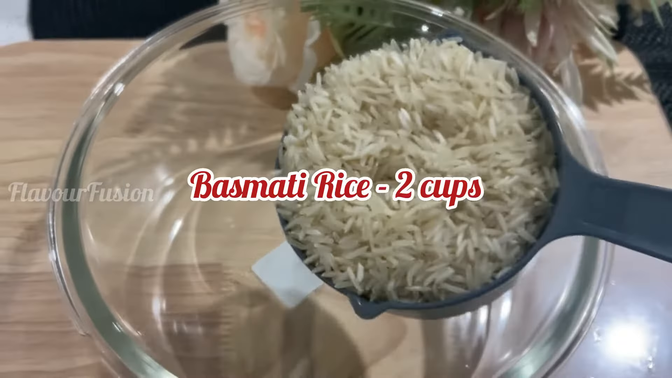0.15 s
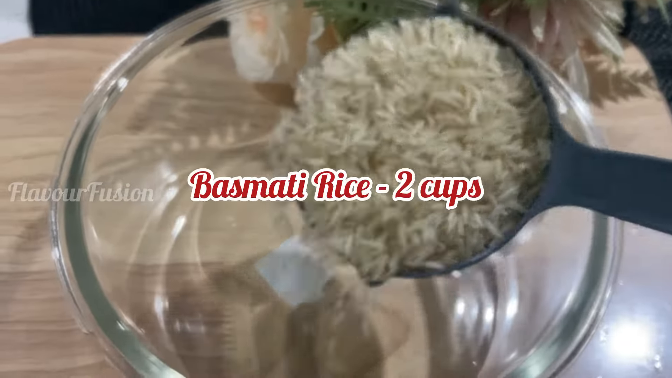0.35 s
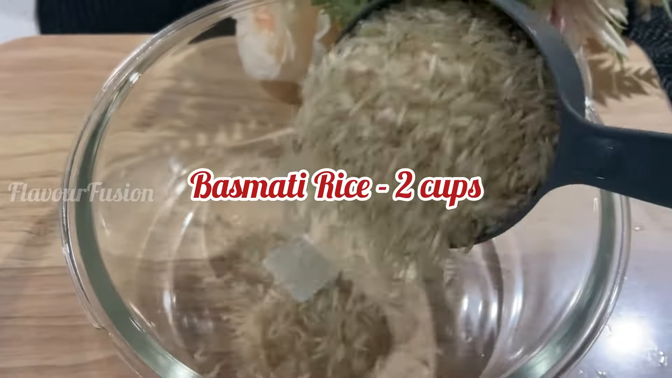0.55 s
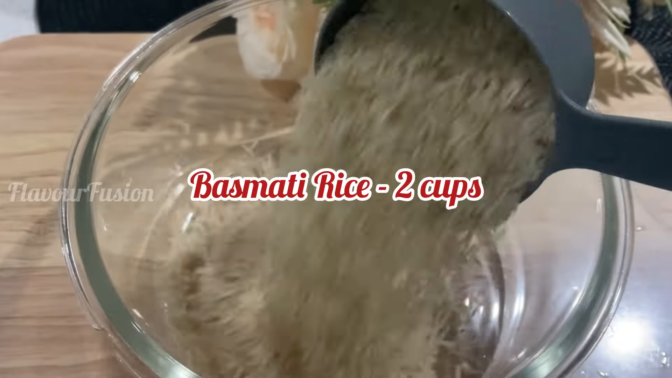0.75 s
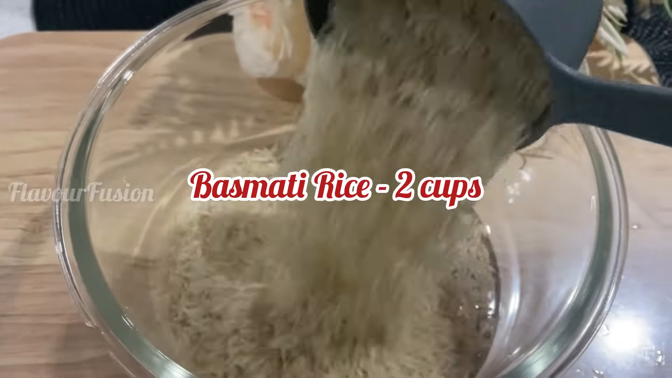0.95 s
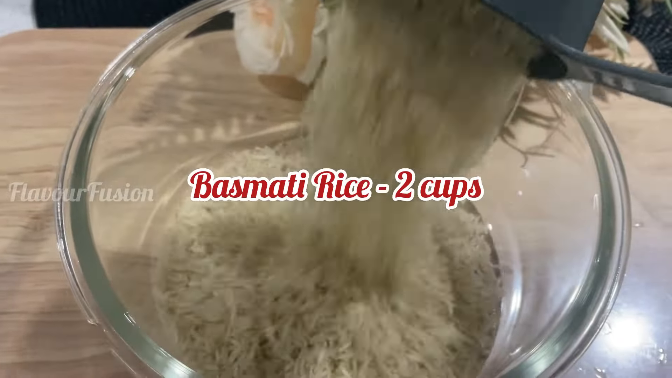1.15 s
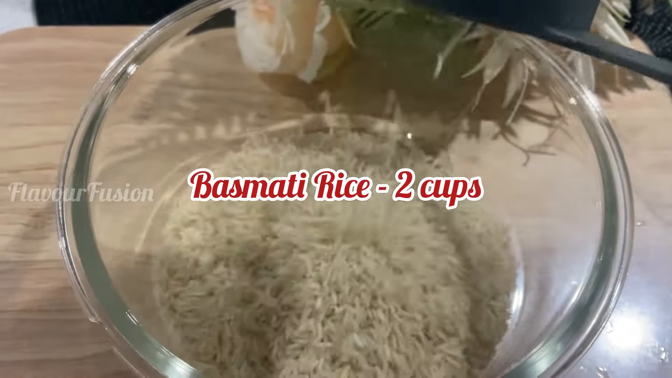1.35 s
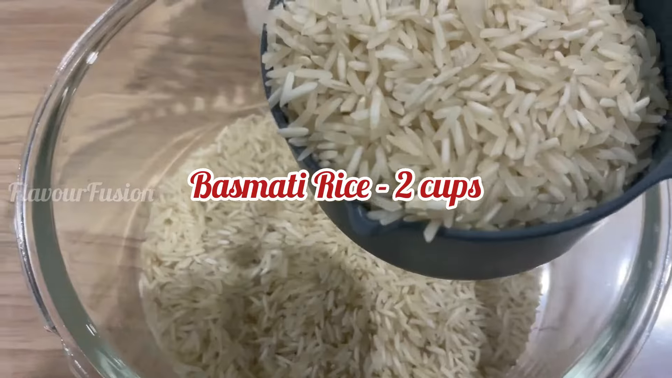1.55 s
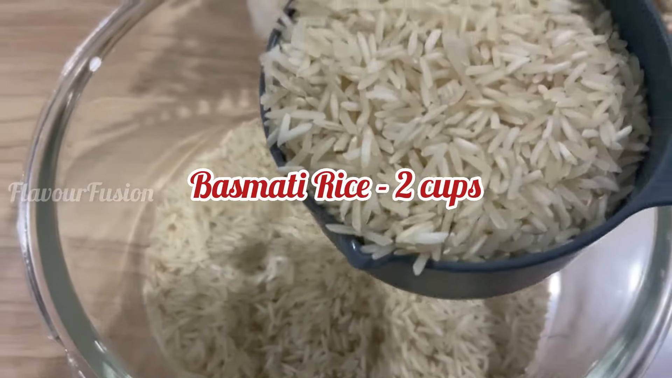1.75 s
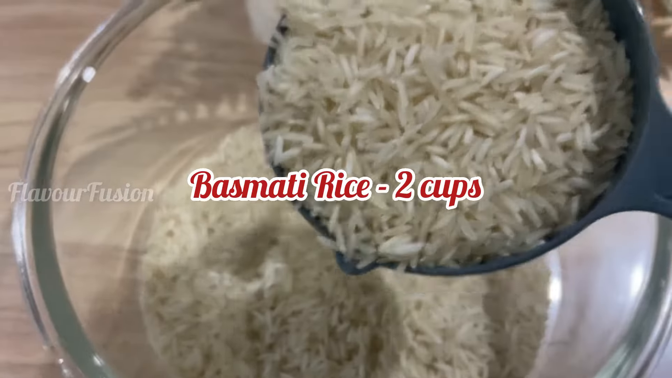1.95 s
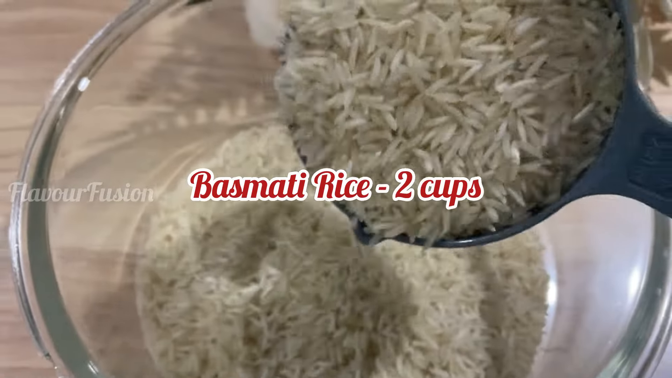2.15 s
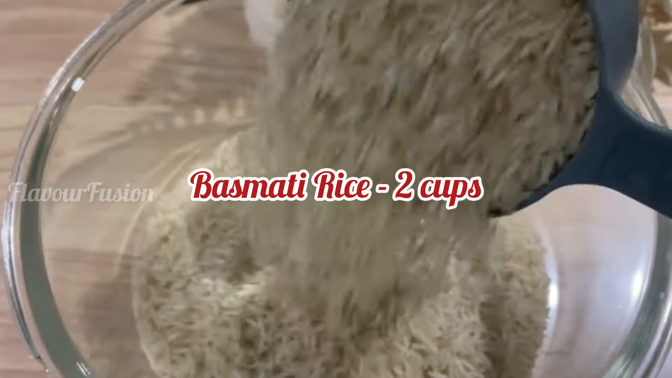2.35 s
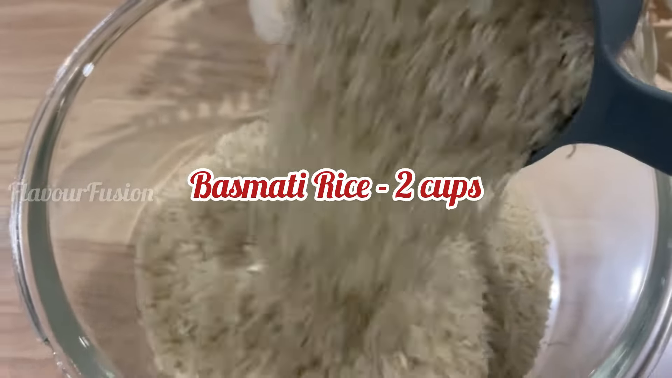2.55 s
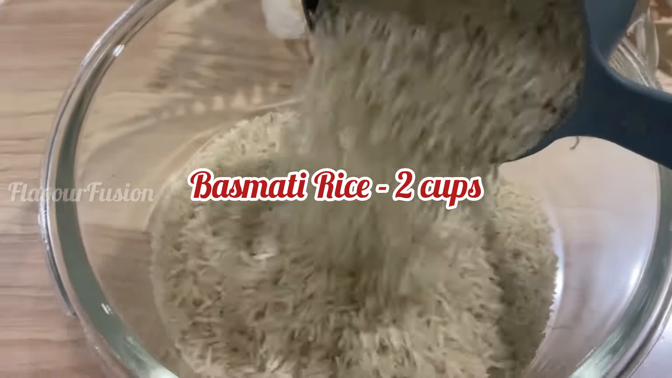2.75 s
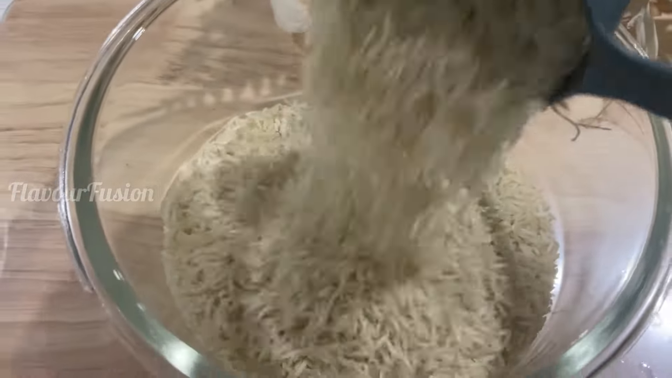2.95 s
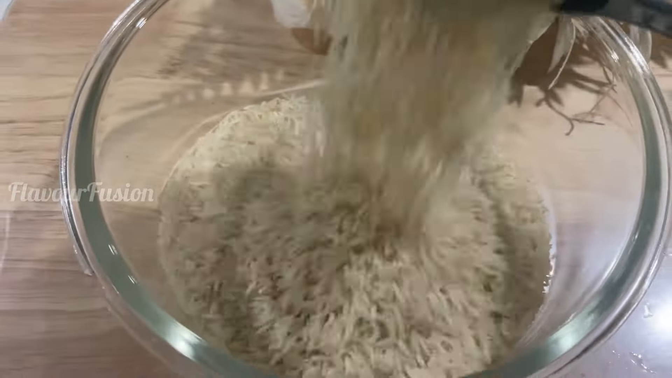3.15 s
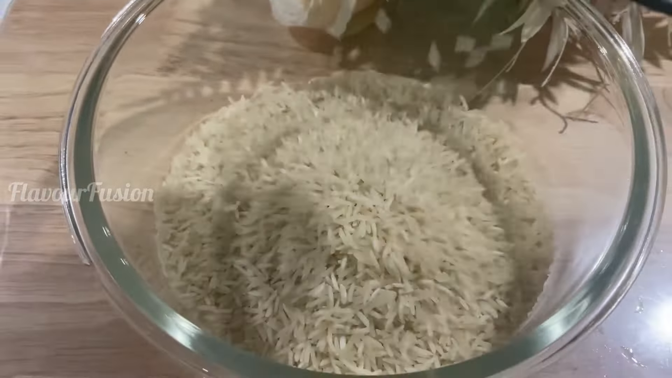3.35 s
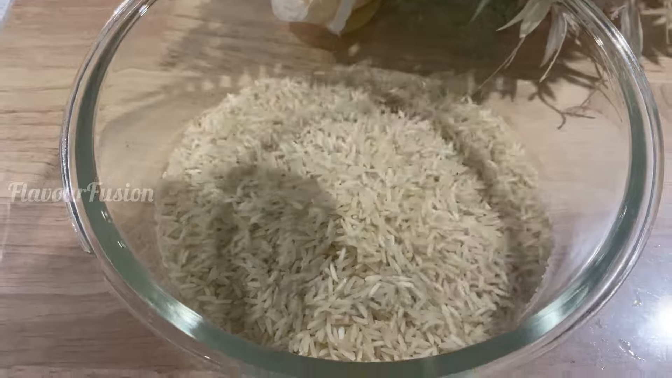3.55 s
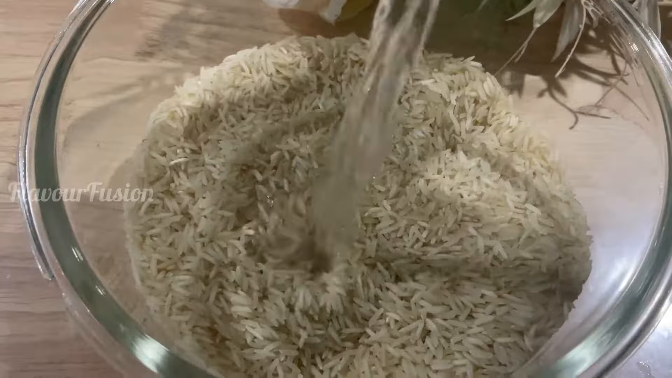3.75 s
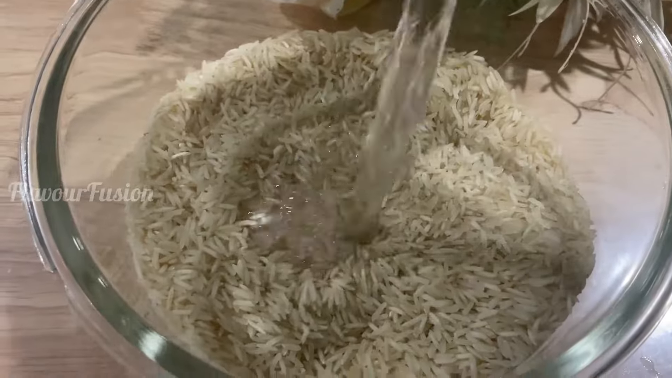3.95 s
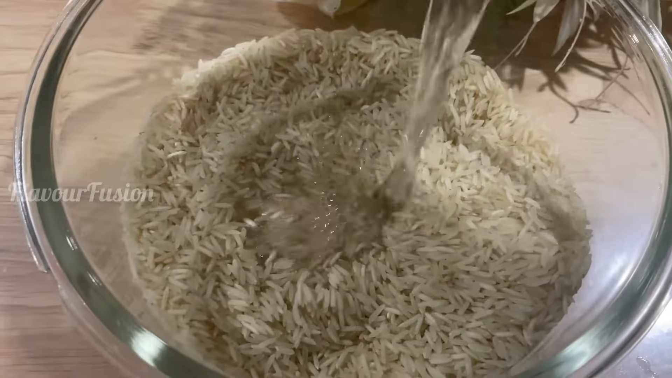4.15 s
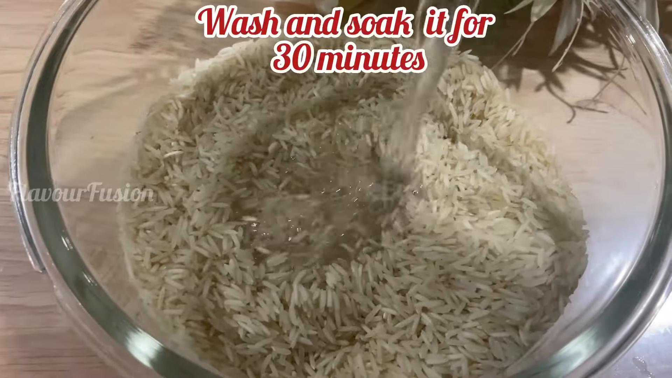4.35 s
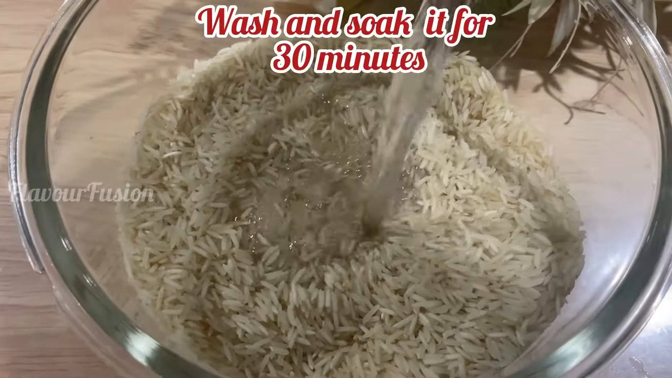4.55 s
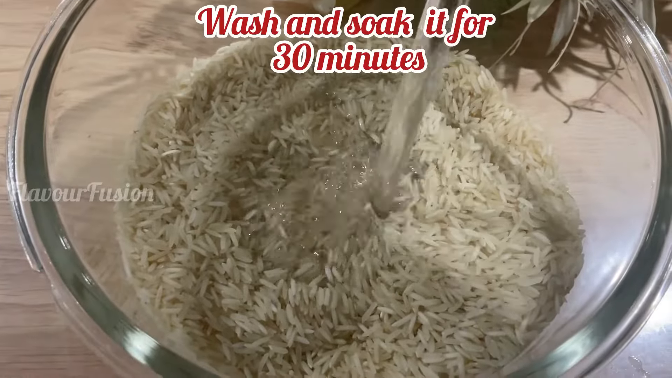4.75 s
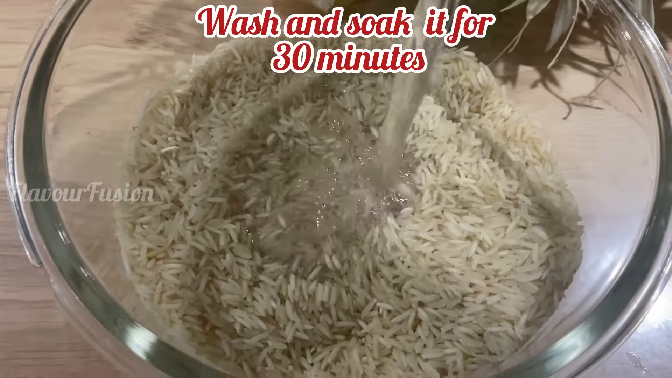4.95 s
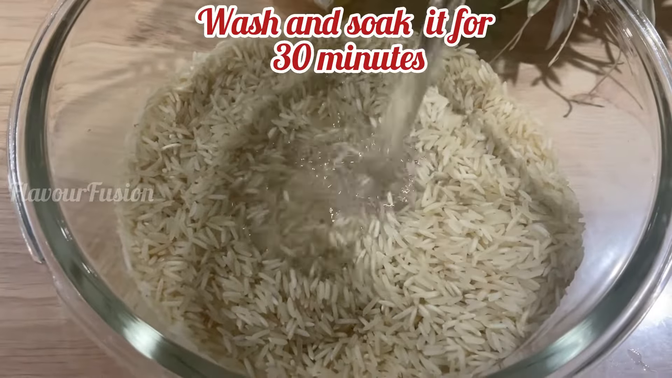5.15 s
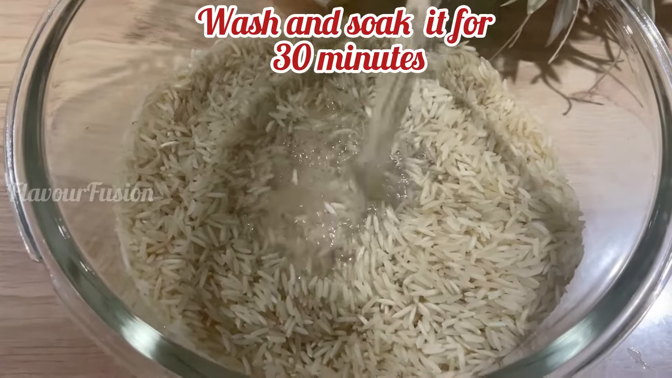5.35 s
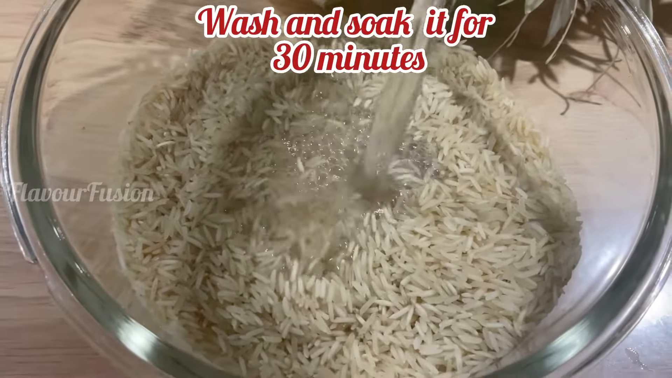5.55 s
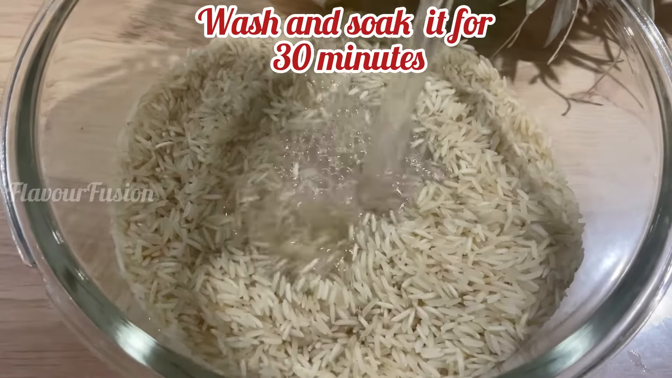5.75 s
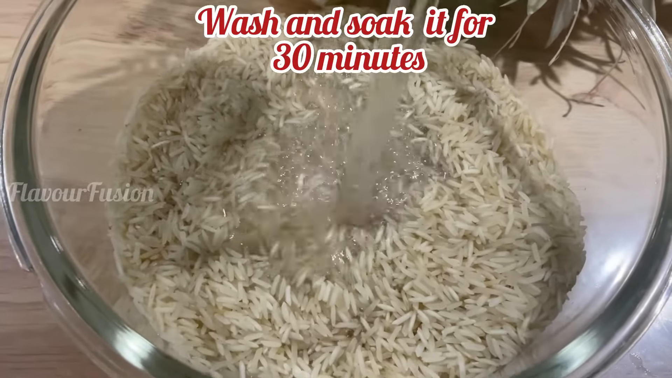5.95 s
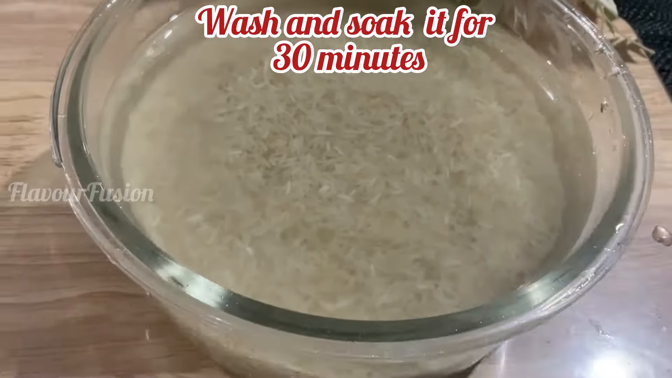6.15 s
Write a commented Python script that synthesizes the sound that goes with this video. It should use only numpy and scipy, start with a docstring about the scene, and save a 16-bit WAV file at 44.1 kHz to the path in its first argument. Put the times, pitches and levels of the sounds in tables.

```python
"""Two cups of dry rice are tipped into a glass bowl on a kitchen table, then water is poured onto the heap.
Rice is dense random clicks that ring the bowl's decaying modes while the glass is bare; once grains cover it,
patter and a duller rush go on over a faint, damped ring. Water is swarms of short rising sines over coloured
noise, with resonances for the gurgling pocket in the heap. Hard cuts join three sections; the last just begins,
with a falling bump and a hiss over quiet kitchen air. A pair of microphone ports hears it all, with phase and
level differing by frequency."""
import sys
import numpy as np
from scipy import signal
from scipy.fft import rfft, irfft, next_fast_len
from scipy.io import wavfile
from scipy.ndimage import uniform_filter1d

SR = 44100
rng = np.random.default_rng(int(sys.argv[2]) if len(sys.argv) > 2 else 0)


def pcm_store(signal):
    """Save signal as 16-bit PCM."""
    levels = np.round(np.clip(np.atleast_2d(signal), -1, 1) * 32767)
    wavfile.write(sys.argv[1], SR, levels.astype(np.int16).T)


N = 273937

# Modes of the bare glass bowl. Each row: pitch in Hz, width in Hz, relative strength in dB when struck
# on the bottom, the same in dB when struck on the wall.
BOWL_MODES = [(2399, 36, -4, -40), (3350, 30, -25, -5), (4340, 90, -1, -28), (5160, 30, -35, -8),
              (6215, 60, -9, -30), (6320, 40, -5, -24), (7280, 30, -35, -9), (7803, 45, -3, -26),
              (8083, 33, -8, -16), (8526, 33, 1, -26), (8832, 28, -16, -4), (9941, 33, -14, 1),
              (10455, 70, -2, -13), (11660, 65, -1, -6), (13640, 70, -6, -22), (13805, 60, -4, -7),
              (15188, 66, -1, -18), (15720, 60, -3, -18)]
# Colour of grain on grain. Each row: frequency in Hz, relative density in dB per Hz.
PATTER_COLOUR = [(1000, -32), (2000, -14), (3000, -15), (4500, -10), (7000, -8), (10000, -4), (16000, 0)]
# Colour of the duller rush inside the heap. Each row: frequency in Hz, relative density in dB per Hz.
RUSH_COLOUR = [(150, -18), (450, -2), (750, 3), (980, -6), (1250, 0), (1650, -4), (2300, -18)]
# The poured stream. Each row: time in seconds, spatter level in dB, gurgle in dB over the spatter.
STREAM = [(3.64, -54, -6), (3.662, -44, -7.5), (3.8, -39.5, -17.5), (3.85, -44, -12), (4.07, -43.5, -10),
          (4.27, -41, -5.5), (4.37, -44.5, -6.5), (4.43, -44, -8), (5.2, -47.5, -6), (6.02, -45.5, -5.5),
          (6.05, -40, -6.5), (6.12, -49.5, 11)]
# Colour of the spatter. Each row: frequency in Hz, relative density in dB per Hz.
SPATTER_COLOUR = [(1800, -15), (2600, 7), (4000, 3), (5500, 5), (7000, 0), (9000, -0.5)]
# Colour of the fizz. Each row: frequency in Hz, relative density in dB per Hz.
FIZZ_COLOUR = [(5000, -9.5), (7500, 1.5), (10000, 4.5), (16000, 3)]
# Colour of the gurgle. Each row: frequency in Hz, relative density in dB per Hz.
GURGLE_COLOUR = [(200, -3), (450, -8.5), (800, 8.5), (1100, 4), (1450, 10), (1900, 10), (2600, -5)]
# Colour of the kitchen air. Each row: frequency in Hz, relative density in dB per Hz.
AIR_COLOUR = [(25, -34), (45, -7), (100, -1), (200, -7.5), (400, -11.5), (1000, -20), (2500, -22),
              (4500, -41), (8000, -47), (16000, -52.5)]
# Kitchen air, the part shared by both ports. Each row: time in seconds, level in dB.
AIR_LEVEL = [(0, -57), (1.52, -61), (3.45, -61.5), (3.7, -66), (6.21, -70)]
# The wavering hum, a single row: pitch in Hz, width in Hz, level in dB.
HUM = (97.8, 1.1, -71)
# Colour of the closing hiss. Each row: frequency in Hz, relative density in dB per Hz.
HISS_COLOUR = [(800, -22), (4800, -27), (6040, -16), (7190, -30), (16000, -30)]
# The microphone ports. Each row: frequency in Hz, lead of the left port in radians, left minus right in dB.
PORTS = [(300, .1, -1), (510, 1, 2), (690, 2.5, 7), (860, 3.8, 3.5), (1030, 5.3, -2), (1400, 5.6, -2.5),
         (1750, 5.4, 0), (2080, 3.7, 1), (2300, np.pi, 0), (3020, np.pi, 0), (3250, 1.7, -1), (3800, .1, 0),
         (5000, .1, -.5), (5700, .5, -5), (7000, .7, -2), (11000, -.3, 0), (15800, -.9, 0)]
# Section edges, a single row of times in seconds; the inner two are the hard cuts.
CUTS = (0, 1.522, 6.121, 7)
# The air pocket that the stream digs into the heap. Each row: time in seconds, central pitch in Hz,
# level in dB over the gurgle, central overtone pitch in Hz.
POCKET = [(3.63, 690, -14, 1420), (3.85, 740, -2.5, 1430), (4.12, 668, 1, 1550), (4.32, 723, -0.5, 1294),
          (4.45, 634, -6, 1480), (5.0, 514, -11, 1456), (6.12, 486, -10, 1530)]
# Two faint far whistles. Each row: start in seconds, end in seconds, pitch in Hz,
# width in Hz of each resonance pass, level in dB before the swell and fade.
WHISTLES = [(1.581, 1.792, 1664, 14, -70.5), (1.825, 2.12, 1860, 25, -76)]
# Flow of grain, one list per cup. Each row: time in seconds, patter level in dB.
FLOWS = [
    [(.23, -48), (.375, -45.5), (.39, -39.5), (.47, -35), (.78, -28.5), (1.22, -32), (1.36, -37.5),
     (1.45, -50.5), (1.52, -59)],
    [(2.09, -59), (2.265, -49), (2.285, -43.5), (2.46, -34.5), (2.76, -38), (3.17, -32), (3.3, -38.5),
     (3.4, -43), (3.48, -58), (3.64, -54)],
]
# Spells when grain meets bare glass, one list per cup: the bottom, then twice the wall.
# Each row: start in seconds, end in seconds, ring in dB over the patter.
BARE_SPELLS = [
    [(0.39, 0.697, 8)],
    [(2.483, 2.64, -5), (3.12, 3.2, -9)],
]
# The rush inside the heap. Each row, one per cup: level in dB over the patter, hollowest moment in seconds.
RUSHES = ((-24.5, 0.94), (-23, 2.88))
# Single ticks: lone grains, and at the end the first water droplets.
# Each row: time in seconds, peak of the crack in dB.
TICKS = [(0.2294, -33.5), (0.3, -30.5), (0.327, -28.5), (0.386, -27.5), (1.516, -33), (1.954, -47.5),
         (1.966, -45.5), (1.9914, -52), (2.058, -46), (2.089, -37.5), (2.1395, -44), (2.167, -32.5),
         (2.2782, -23.5), (3.525, -30), (3.55, -32), (3.601, -28.5), (3.627, -25)]
# Loud bubbles, small pops and large gulps. Each row: time in seconds, peak in dB, starting pitch in Hz.
LOUD_BUBBLES = [(3.665, -38, 1370), (3.694, -29, 10700), (3.726, -42, 1400), (3.75, -23, 7400),
                (3.771, -34.5, 1370), (3.8, -22, 7340), (3.904, -29.5, 7840), (3.9664, -29.5, 11700),
                (3.992, -37.5, 710), (4.033, -32.5, 1850), (4.073, -40, 660), (4.114, -31.5, 1675),
                (4.2116, -26.5, 10500), (4.289, -32, 940), (4.314, -24.5, 5070), (4.341, -19.5, 5800),
                (4.367, -30, 674), (4.6244, -34, 5030), (4.7358, -32.5, 4600), (4.86, -39, 1310),
                (5.069, -36.5, 5870), (5.109, -46.5, 655), (5.165, -44.5, 504), (5.289, -33.5, 3740),
                (5.3883, -27, 6170), (5.444, -44, 1620), (5.456, -32, 5960), (5.499, -38.5, 1370),
                (5.61, -36, 3470), (5.611, -47.5, 525), (5.846, -38, 1500), (5.9122, -34, 3700),
                (5.921, -46.5, 526), (6.043, -32.5, 3500), (6.05, -36, 500), (6.105, -41, 1510)]
# Ring that the large gulps draw from the pocket, a single row: pocket rms in dB, overtone rms in dB.
KNOCK_DB = -64, -66.5
# Where the water lands. Each row: frequency in Hz, phase shift of the left port in radians, level shift in dB.
WATER_SPOT = [(1750, 0, 0), (2120, .85, 0), (2440, 0, 0), (2950, -.65, -3), (3400, 0, 0)]
# The bottom of the bowl. Each row: frequency in Hz, phase shift of the left port in radians, level shift in dB.
BOTTOM_SPOT = [(2050, 0, 0), (2400, .75, 0), (2600, 0, 0)]
# Echoes that differ between the ports. Each row: frequency in Hz, level in dB against the direct sound.
ECHO_COLOUR = [(300, -12), (700, -6), (2100, -5), (2450, -32), (2950, -32), (3300, -6), (8600, -14)]

# Rice
DENSE_DB = -41  # below this flow the stream thins out into separate grains
MEET_DB_PER_S, BURY_DB_PER_S = 499.5, 87  # how fast the ring opens and is covered
BURIED_DB, BURIED_DAMPING = -18.5, 5.9  # ring under rice, over the patter; factor on every mode's width
HOLLOW_S, HOLLOW_HZ = 0.13, 1390  # the hollow swell of the rush: half-width and pitch
PING_DB = 17.5  # ring of a lone grain over its crack
# Water
FLOOD_S, FLOOD_TAKES_S = 4.3, 0.0053  # the dry heap drowns and the fizz drops
FIZZ_DRY_DB, FIZZ_FLOODED_DB = 1.5, -8  # over the spatter
OVERTONE_DB = -8.5  # over the gurgle
WANDER = 0.05  # rms share by which the pocket's pitches drift
POP_HZ, BURST_DB = 3000, -21  # bubbles above this pitch crack; the crack against the bubble's peak
SPLASH_DB, SPLASH_S = -13, 0.0031  # spray of each loud bubble against its peak, and its swell
# Bump and hiss
BUMP_S, BUMP_DB, BUMP_SWELL_S = 6.129, -27.5, 0.03
BUMP_SWELL_DB_PER_S, BUMP_DIE_DB_PER_S = 594, 1496
BUMP_START_HZ, BUMP_LOW_HZ, BUMP_SINK_S = 348, 38, 0.0145
HISS_S, HISS_DB, HISS_RISE_S = 6.161, -54, 0.0089
EDGE_HZ = 15830  # band limit


def amp(db):
    """Decibels to linear gain."""
    return 10 ** (np.asarray(db) / 20)


def evened(x):
    """Sets the rms to 1."""
    return x / np.sqrt(np.mean(x ** 2) + 1e-20)


def read(points, hz, column=1):
    """Reads a spectrum table along a logarithmic frequency axis."""
    table = np.transpose(points)
    return np.interp(np.log(hz + 1), np.log(table[0] + 1), table[column])


def play(rows):
    """Gives a gate that is open while a curve table lasts, then its columns at every sample."""
    s, *columns = np.transpose(rows)
    t = np.arange(N) / SR
    gate = (t >= s[0]) & (t < s[-1])
    return gate, *(np.interp(t, s, c) for c in columns)


def coloured(x, points):
    """Filters x by a spectrum and sets its rms to 1."""
    size = next_fast_len(N)
    gain = amp(read(points, np.fft.rfftfreq(size, 1 / SR)))
    return evened(irfft(rfft(x, size) * gain, size)[:N])


def drifting(first, second):
    """Slow random drift: noise averaged twice, over two spans in samples, with rms 1."""
    noise = rng.standard_normal(N)
    return evened(uniform_filter1d(uniform_filter1d(noise, first), second))


def clicks(per_s, spread_db):
    """Random impacts of either sign: many small, a few large."""
    luck, side = rng.random((2, N))
    luck = luck * SR / per_s
    hit, out = luck < 1, np.zeros(N)
    size_db = spread_db * np.minimum(-np.log(luck[hit]), 5)
    out[hit] = amp(size_db) * np.sign(side[hit] - .5)
    return evened(out)


def strikes(rows):
    """Places a click of the listed size at each listed time."""
    out = np.zeros(N)
    s, db = np.transpose(rows)
    out[(s * SR).astype(int)] = amp(db)
    return out


def resonate(x, hz, width, count=1):
    """A moving resonance: shifts the pitch curve down to zero, smooths count times, and shifts back."""
    turn = np.exp(2j * np.pi * np.cumsum(hz * np.ones(N)) / SR)
    r = np.exp(-np.pi * width / SR)
    low = x / turn + 1e-18
    for _ in range(count):
        low = signal.lfilter([1 - r], [1, -r], low)
    out = (turn * low).real
    return out / np.sqrt(np.mean(out ** 2, -1, keepdims=True))


def cavity(x, hz, width):
    """A steep resonance: the same one passed twice."""
    return resonate(x, hz, width, count=2)


def shifted(pair, points):
    """Turns the phase and level of the left channel against the right, by frequency."""
    size = next_fast_len(N + 4096)
    hz = np.fft.rfftfreq(size, 1 / SR)
    half = amp(read(points, hz, column=2) / 2) * np.exp(.5j * read(points, hz))
    return irfft(rfft(pair, size) * np.array([half, 1 / half]), size)[:, :N]


def kitchen():
    """Steady air noise, a wavering hum of narrow noise, and far whistles from steep resonances."""
    hz, width, db = HUM
    hum = amp(db) * resonate(rng.standard_normal(N), np.full(N, hz), width)
    shared, left, right = (coloured(z, AIR_COLOUR) for z in rng.standard_normal((3, N)))
    air = shared + 0.38 * np.array([left, right])  # part of it arrives from all sides
    t, whistles = np.arange(N) / SR, np.zeros(N)
    for start, end, hz, width, db in WHISTLES:
        swell = np.sin(np.pi * np.clip((t - start) / (end - start), 0, 1))
        whistles += amp(db) * swell * cavity(rng.standard_normal(N), hz, width)
    return amp(play(AIR_LEVEL)[1]) * air + hum + whistles


def closing_hiss():
    """Coloured noise, faint from the last cut on, that swells after a moment."""
    t = np.arange(N) / SR
    rise = np.clip((t - HISS_S) / HISS_RISE_S, .25, 1) * (t > CUTS[2])
    return rise * amp(HISS_DB) * coloured(rng.standard_normal(N), HISS_COLOUR)


def bump():
    """A falling thump through the housing that reaches the right port ahead of the left."""
    t = np.maximum(np.arange(N) / SR - BUMP_S, 0)
    hz = BUMP_LOW_HZ + (BUMP_START_HZ - BUMP_LOW_HZ) * np.exp(-t / BUMP_SINK_S)
    phase = 2 * np.pi * np.cumsum((t > 0) * hz) / SR
    ahead = 1.8 + 2 * np.pi * hz * .003  # radians: a fixed turn plus a 3 ms lead
    swell = BUMP_SWELL_DB_PER_S * (BUMP_SWELL_S - t)
    die = BUMP_DIE_DB_PER_S * (t - BUMP_SWELL_S)
    onset = np.minimum(t / 0.00063, 1)
    return onset * amp(BUMP_DB - np.maximum(swell, die)) * np.sin([phase, phase + ahead])


def bubble(hz, cycles, glide):
    """A short sine that swells, rises in pitch and dies."""
    u = np.arange(int(4 * cycles * SR / hz)) * hz / (SR * cycles)
    tone = np.sin(2 * np.pi * cycles * (u + glide * u ** 2 / 2))
    return tone * u ** 2 * np.exp(-2.4 * u)


def bubbles(lo_hz, hi_hz, per_s, cycles, spread_db, count):
    """A swarm of bubbles of many sizes, each size set off by its own random clicks."""
    sizes = [bubble(hz, cycles, 0.055) for hz in np.geomspace(lo_hz, hi_hz, count)]
    return evened(sum(signal.oaconvolve(clicks(per_s / count, spread_db), b)[:N] for b in sizes))


def loud_bubbles(rows, cycles, glide):
    """The listed bubbles, each rising from its own pitch."""
    out = np.zeros(N + SR)
    for s, db, hz in rows:
        b = bubble(hz, cycles, glide)
        out[round(s * SR):][:len(b)] += amp(db) * b / abs(b).max()
    return out[:N]


def water():
    """Spatter and fizz of small bubbles over a wash, and a gurgle in the heap; the stream lands in lumps."""
    gate, spatter_db, gurgle_db = play(STREAM)
    t = np.arange(N) / SR
    fizz_db = np.interp(t, [FLOOD_S, FLOOD_S + FLOOD_TAKES_S], [FIZZ_DRY_DB, FIZZ_FLOODED_DB])
    wash = rng.standard_normal((3, N))
    lumps = drifting(260, 160)
    surge, drift = drifting(1500, 1500), drifting(1500, 1500)

    spatter = bubbles(1959, 10500, 3500, 4.53, 3.74, count=14) + 0.54 * wash[0]
    spatter = coloured(spatter, SPATTER_COLOUR) * amp(1.9 * lumps)
    fizz = bubbles(5500, 15200, 970, 3.4, 2.14, count=8) + 0.63 * wash[1]
    fizz = coloured(fizz, FIZZ_COLOUR) * amp(1.0 * lumps + 2.9 * drift)
    gurgle = bubbles(422.5, 2660, 450, 2.67, 3.1, count=12) + 1.42 * wash[2]
    gurgle = coloured(gurgle, GURGLE_COLOUR) * amp(2.47 * lumps + 1.6 * surge)

    # random gulps and the listed large ones both ring the pocket and its overtone
    _, pocket_hz, pocket_db, overtone_hz = play(POCKET)
    pocket_hz = pocket_hz * (1 + WANDER * surge)
    overtone_hz = overtone_hz * (1 + WANDER * drift)
    gulps = clicks(260, 3.2) * amp(1.6 * lumps + 1.5 * surge)
    large = strikes([row[:2] for row in LOUD_BUBBLES if row[2] < POP_HZ])
    drives = np.array([gulps, large])
    low, high = cavity(drives, pocket_hz, 133.0), cavity(drives, overtone_hz, 160.0)
    gurgle = gurgle + amp(pocket_db) * low[0] + amp(OVERTONE_DB) * high[0]
    knocks = amp(KNOCK_DB[0]) * low[1] + amp(KNOCK_DB[1]) * high[1]

    # each loud bubble throws spray: a brief swell of the whole stream
    spray = t[:3000] / SPLASH_S * np.exp(1 - t[:3000] / SPLASH_S)
    splash = signal.oaconvolve(strikes([row[:2] for row in LOUD_BUBBLES]), spray)[:N]
    level = amp(spatter_db + 0.46 * surge) + amp(SPLASH_DB) * splash
    stream = level * (spatter + amp(fizz_db) * fizz + amp(gurgle_db) * gurgle)
    return gate * (stream + knocks) + loud_bubbles(LOUD_BUBBLES, 4., .05)


def glass(blows, column, damping=1):
    """The bowl's modes, each a decaying sine, rung by a train of blows; nothing sounds below about 2 kHz."""
    t, ring = np.arange(6000) / SR, np.zeros(6000)
    for k, mode in enumerate(BOWL_MODES):
        hz, width = mode[:2]
        decay = np.exp(-np.pi * width * damping * t)
        ring += (-1) ** k * amp(mode[column]) * width * decay * np.sin(2 * np.pi * hz * t)
    ring *= 1 - np.exp(-t / 0.00075)  # a soft contact keeps the modes apart
    ring = signal.sosfilt(signal.butter(4, 2000, "high", fs=SR, output="sos"), ring)
    return signal.oaconvolve(blows, ring / np.linalg.norm(ring))[:N]


def stray_cracks():
    """Lone grains, first droplets and small bubbles crack as bursts of bright noise; bare glass also rings."""
    t, out = np.arange(600) / SR, np.zeros(N + SR)
    rows = TICKS + [(s, db + BURST_DB) for s, db, hz in LOUD_BUBBLES if hz > POP_HZ]
    for s, db in rows:
        crack = np.diff(rng.standard_normal(601)) * t * np.exp(-t / 0.00095)
        out[int(s * SR):][:600] += amp(db) * crack / abs(crack).max()
    covered_s = BARE_SPELLS[0][0][1]
    pings = strikes([row for row in TICKS if row[0] < covered_s])
    return out[:N] + amp(PING_DB) * glass(pings, column=2)


def cup(rows, bare, heap, column):
    """A stream of grains: dense patter, the glass ringing where it is bare, a duller rush inside the heap."""
    gate, flow_db = play(rows)
    t = np.arange(N) / SR
    start, end, bare_db = np.transpose(bare)[..., None]
    cover_db = MEET_DB_PER_S * np.maximum(start - t, 0) + BURY_DB_PER_S * np.maximum(t - end, 0)
    ring_db = flow_db + (bare_db - cover_db).max(0)

    dense = np.clip(amp(flow_db - DENSE_DB), .05, 1)
    # fewer grains, each raised so the patter still follows the flow level
    grains = clicks(9000 * dense, 3.06) / np.sqrt(dense)
    patter = amp(flow_db) * coloured(grains, PATTER_COLOUR)

    ring = glass(clicks(900, 2.2) * gate * amp(ring_db), column)
    buried = clicks(1800, 0.71) * gate * amp(flow_db + BURIED_DB)
    ring += glass(buried, column, damping=BURIED_DAMPING)

    rush_db, hollowest_s = heap
    hollow = np.exp(-((t - hollowest_s) / HOLLOW_S) ** 2) * cavity(clicks(3000, 2.), HOLLOW_HZ, 600.)
    rush = amp(flow_db + rush_db) * (coloured(clicks(3000, 1.92), RUSH_COLOUR) + hollow)
    return gate * (patter + rush) + ring


def table_echoes():
    """Short echoes from table and walls: noise falling 60 dB in 0.2 s, different at each port."""
    t = np.arange(3000) / SR
    echoes = rng.standard_normal((2, 3000)) * amp(-60 * t / 0.2) * (t > .001)
    gain = amp(read(ECHO_COLOUR, np.fft.rfftfreq(3000, 1 / SR)))
    return irfft(rfft(echoes / np.linalg.norm(echoes[0])) * gain)


def scene():
    """Places the sources, echoes each section with the same response, and lays kitchen and bump beneath."""
    first = cup(FLOWS[0], BARE_SPELLS[0], RUSHES[0], column=2) + stray_cracks()
    near = cup(FLOWS[1], BARE_SPELLS[1], RUSHES[1], column=3) + closing_hiss()
    near = near + shifted(first[None], BOTTOM_SPOT) + shifted(water()[None], WATER_SPOT)
    echoes = table_echoes()
    section = np.searchsorted(CUTS, np.arange(N) / SR)
    out = bump() + kitchen()
    for k in np.unique(section):  # echoes stop at each cut; a glass ring may run on past it
        inside = section == k
        part = near * inside
        out += part + signal.oaconvolve(part, echoes, axes=1)[:, :N] * inside
    return out


def record(dry):
    """The two ports differ in phase and level by frequency; then the band limit."""
    low_pass = signal.firwin(1023, EDGE_HZ, window=("kaiser", 9), fs=SR)
    return signal.oaconvolve(shifted(dry, PORTS), low_pass[None], "same")


dry = scene()
out = record(dry)
pcm_store(out)
```